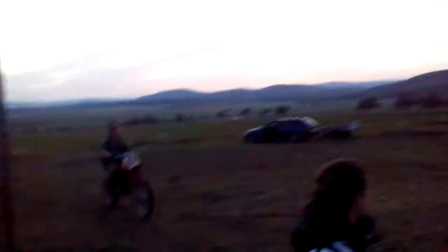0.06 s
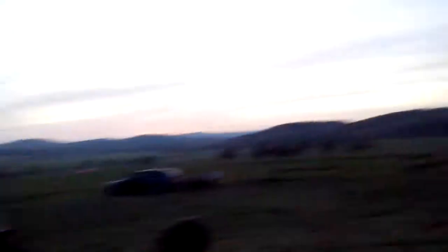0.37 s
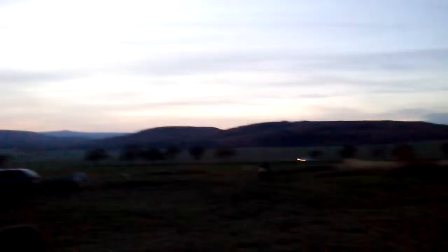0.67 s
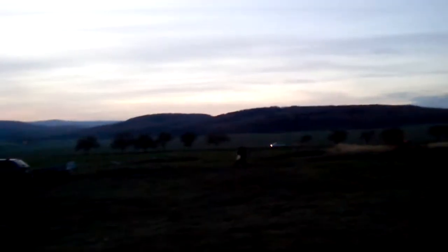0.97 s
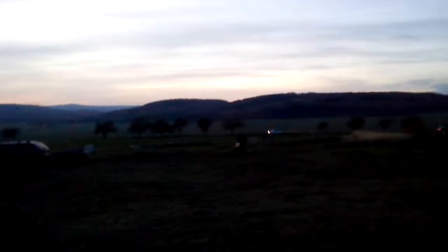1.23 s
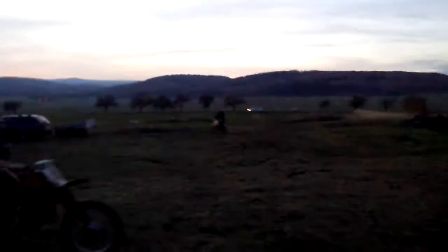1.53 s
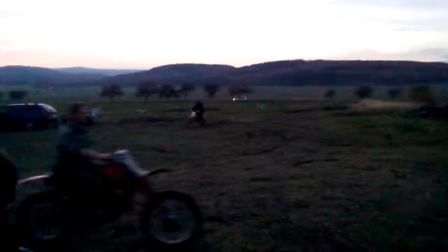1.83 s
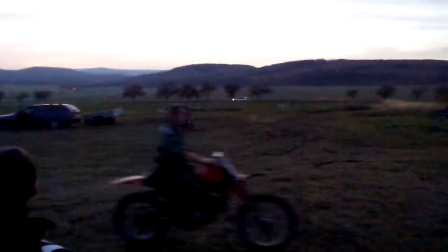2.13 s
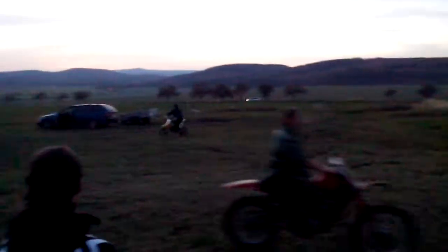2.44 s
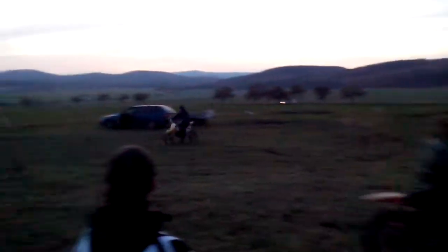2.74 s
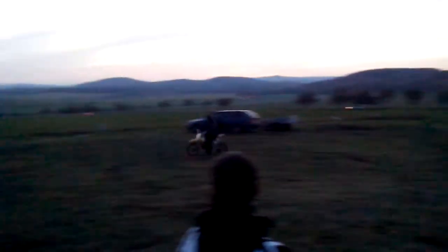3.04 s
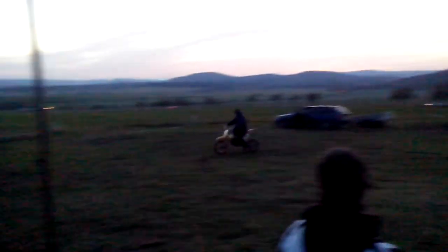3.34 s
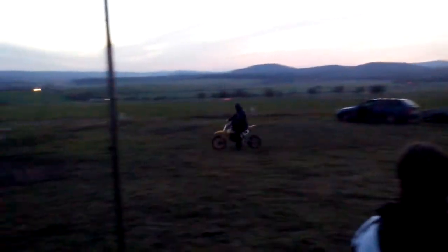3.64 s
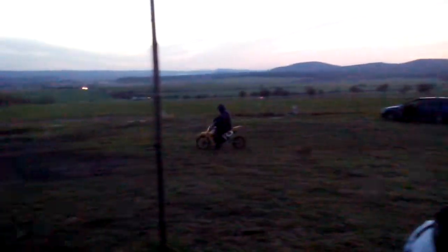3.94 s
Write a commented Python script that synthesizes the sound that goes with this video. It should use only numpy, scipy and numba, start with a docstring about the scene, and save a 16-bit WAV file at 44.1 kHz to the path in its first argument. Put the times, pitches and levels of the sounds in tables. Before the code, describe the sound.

Dirt bike engines outdoors, one rasping past nearby and one droning far off, in light wind.

```python
"""A low boom carries over an open field: a distant single-cylinder dirt bike revs, shifts up twice and
rolls off. Close by, a second one rides slowly past, left to right, its exhaust swelling to a bark and
rasp over the hiss and rattle of engine and chain. Each engine is a train of firing pulses: their rate
sets the pitch, and the resonances they excite in pipe and casing set the timbre.
A light wind rumbles on the microphones."""
import sys
import numpy as np
from scipy import signal
from scipy.io import wavfile
from scipy.ndimage import uniform_filter1d
from numba import njit

SR = 44100
rng = np.random.default_rng(int(sys.argv[2]) if len(sys.argv) > 2 else 0)


def to_wav(s):
    """Save 16-bit WAV."""
    ch = np.atleast_2d(s).T  # columns
    pcm = np.round(np.clip(ch, -1, 1) * 32767)  # PCM
    wavfile.write(sys.argv[1], SR, pcm.astype(np.int16))


N = 176400
T = np.arange(N) / SR
GAS_DECAY_S = .003

# Loudness of the near bike's engine and chain. Each row: time in seconds, level in dB.
MACHINERY_LEVEL = [(0.0, -31.5), (0.6, -29.5), (1.1, -29), (1.55, -31), (1.85, -27.5), (2.2, -25.5),
                   (2.7, -27), (3.1, -27.5), (3.4, -29.5), (3.7, -30.5), (4.0, -37.5)]
# Lag of the near bike at the right microphone. Each row: time in seconds, delay in seconds.
RIGHT_DELAY = [(0, 0.0013), (.4, 0.0012), (.6, 0.0013), (.9, .0014), (1.15, 0.0013), (1.75, .0012),
               (2.1, 0.0011), (2.4, 0.0011), (2.8, 0.000933), (3.1, 0.00081), (3.45, 0.00067), (4, 0.0006)]


def from_db(db):
    """Amplitude grows tenfold for every 20 dB."""
    return 10 ** (np.asarray(db) / 20)


def in_time(rows):
    """Linear interpolation gives each column of a time curve at every sample."""
    times, *columns = np.transpose(rows)
    return [np.interp(T, times, column) for column in columns]


def at_hz(points, hz):
    """Interpolation on a logarithmic frequency axis reads a spectrum at one frequency."""
    frequencies, values = np.transpose(points)
    return np.interp(np.log(hz), np.log(frequencies), values)


def even(x):
    """Division by the running rms holds the slow level at 1."""
    power = uniform_filter1d(uniform_filter1d(x ** 2, size=4400), size=4400)
    return x / np.sqrt(power + 1e-18)


def fade(clicks, decay_s):
    """Each impulse starts an exponential decay."""
    return signal.lfilter([1], [1, -np.exp(-1 / (decay_s * SR))], clicks + 1e-18)


def firings(speed, first_cycle, uneven_db, jitter_s):
    """A quasi-periodic impulse train: one click a cycle, varying a little in strength and timing."""
    cycles = np.cumsum(in_time(speed)[0]) / SR
    onsets_s = np.interp(np.arange(first_cycle, cycles[-1], 1), cycles, T)
    timing, strength = rng.standard_normal((len(onsets_s), 2)).T
    samples = ((onsets_s + jitter_s * timing) * SR).astype(int)
    clicks = np.zeros(N)
    clicks[np.clip(samples, 0, N - 1)] = from_db(uneven_db * np.minimum(strength, 1.5))
    return clicks


def puffs(clicks, rough, decay_s):
    """Each firing is a pressure pulse followed by a decaying burst of turbulence."""
    envelope = np.sqrt(2 / (decay_s * SR)) * fade(clicks, decay_s)
    return clicks + rough * envelope * rng.standard_normal(N)


@njit
def resonate(x, hz, width_hz):
    """A damped resonator of peak gain 1, its centre frequency given at every sample."""
    angle = 2 * np.pi * hz / SR
    r = np.exp(-np.pi * width_hz / SR)
    y = np.zeros(len(x))
    for i in range(2, len(x)):
        drive = (1 - r * r) / 2 * (x[i] - x[i - 2])
        y[i] = drive + 2 * r * np.cos(angle[i]) * y[i - 1] - r * r * y[i - 2]
    return y


def ring(x, modes, band_hz, scale=1):
    """Modal superposition: resonances add with alternating sign, band-limited and held at rms 1."""
    total = sum((-1) ** k * from_db(db) * resonate(x, centre * scale * np.ones(N), width)
                for k, (centre, width, db) in enumerate(modes))
    return even(signal.sosfilt(signal.butter(2, band_hz, "band", fs=SR, output="sos"), total))


def arrive(x, lag_s):
    """A path difference brings the sound to the right microphone later than to the left."""
    left, right = np.broadcast_to(x, (2, N))
    return np.array([left, np.interp(T - lag_s, T, right)])


def far_bike():
    """Only the low exhaust resonances carry this far; the boom gains an edge at high revs."""
    # Engine speed. Each row: time in seconds, firings per second.
    speed = [(0, 56), (.1, 58.4), (.25, 59.5), (.4, 64), (.5, 64.5), (.68, 62.5), (.77, 48.5), (.92, 48.5),
             (1.15, 50), (1.35, 53.5), (1.55, 56.3), (1.78, 56.5), (1.88, 44.3), (2.1, 44.3), (2.4, 45.5),
             (2.46, 41), (2.7, 38.7), (2.9, 36.8), (3.25, 36.8), (3.6, 35.8), (4, 35.7)]
    # Loudness of the exhaust. Each row: time in seconds, level in dB.
    level = [(0.0, -18.5), (0.15, -18.5), (0.3, -16), (0.5, -19), (0.62, -19.5), (0.75, -18), (0.9, -16),
             (1.3, -16.5), (1.6, -16.5), (1.75, -17), (1.9, -17), (2.25, -15), (2.42, -17.5), (2.6, -15.5),
             (2.85, -21), (3.3, -21), (3.7, -19), (4.0, -20)]
    # Two sets of pipe resonances. Each row: frequency in Hz, bandwidth in Hz, level in dB.
    boom_modes = [(123.3, 40, 0.5), (182.2, 38.6, -4.5), (235.2, 46.7, -6.5)]
    edge_modes = [(237.3, 100, 4), (357, 13, -12), (344, 76, -2.5), (537, 87, -21)]
    clicks = firings(speed, first_cycle=.55, uneven_db=.8, jitter_s=.00008)
    gas = puffs(clicks, rough=.08, decay_s=.006)
    boom = ring(gas, boom_modes, band_hz=(77, 596))
    edge_db = -9.5 + (in_time(speed)[0] - 55)  # 1 dB more for each extra firing per second
    edge = from_db(edge_db) * ring(gas, edge_modes, band_hz=(206, 795))
    return arrive(from_db(in_time(level)[0] - 3) * (boom + edge), lag_s=.001)


def double_hit(x, delay_s=.0045, second_db=-9):
    """Delay and add: a weaker second hit follows each firing a few milliseconds later."""
    return x + from_db(second_db) * np.interp(T - delay_s, T, x)


def scatter(x, t60_s=.1):
    """Scattering leaves a short diffuse tail, different in each channel."""
    t = np.arange(SR // 4) / SR
    tail = rng.standard_normal((2, len(t))) * from_db(-60 * t / t60_s)
    tail /= np.sqrt(np.sum(tail ** 2, axis=1, keepdims=True))
    return signal.fftconvolve(x[None], tail, axes=1)[:, :N]


def near_exhaust(clicks):
    """Forced resonance: the firings ring the pipe in four registers, thud, drone, bark and rasp."""
    # Turbulence of the firings. Each row: time in seconds, roughness from 0 to 1.
    turbulence = [(0, .2), (1.4, .22), (1.8, .3), (2.1, .27), (2.3, .42), (2.72, .35), (2.85, .12),
                  (3.45, .14), (3.6, .38), (3.76, .12), (4, .14)]
    # Pipe resonances. Each row: frequency in Hz, bandwidth in Hz, level in dB.
    thud_modes = [(56, 18, -6.5), (113, 210, -3.5), (254, 86, -3)]
    drone_modes = [(290, 77, -3.5), (327.3, 16, 9), (384, 55, -1), (514, 89, -8.5)]
    rasp_modes = [(1047, 140, 0.5), (1417, 13, 0.5), (1612, 37, 5), (1813, 24, -1), (1924, 33, 3.5),
                  (2320, 290, -10.5), (2619, 65, -1), (3174, 270, -9.5), (4040, 600, -22)]
    # Main resonance, rising with the throttle. Each row: time in seconds, frequency in Hz.
    bark_centre = [(0, 653), (1.0, 683), (1.7, 665), (2.1, 712), (2.4, 651), (2.7, 667), (3.0, 703),
                   (3.25, 732), (3.5, 620), (3.8, 603), (4, 570)]
    # Bark resonances. Each row: multiple of the main one, bandwidth in Hz, level in dB.
    bark_modes = [(.84, 70, -2), (1.002, 76.8, 5), (1.161, 90, 3.5), (1.37, 70, -16.5)]
    # Loudness of the low registers. Each row: time in seconds, level in dB.
    thud_level = [(0, -45), (1.0, -42), (2.0, -29), (2.6, -28.5), (3.1, -40.5), (4, -30)]  # strongest from 2 to 2.6 s, returning at the end
    drone_level = [(0, -27), (1, -46.5), (2.4, -43.5), (2.85, -38.5), (3.05, -25.5), (3.5, -33), (3.8, -27),
                   (4, -28)]
    # Loudness of the high registers. Each row: time in seconds, bark in dB, rasp in dB.
    bark_rasp_levels = [(0, -32.5, -40), (.3, -52, -47), (.6, -37.5, -41.5), (.95, -24.5, -23.5),
                        (1.2, -22.5, -30), (1.45, -19.5, -29), (1.6, -16, -25.5), (1.82, -17, -31),
                        (1.92, -22, -29), (2.1, -23, -32.5), (2.35, -20.5, -27), (2.48, -20, -27),
                        (2.72, -15, -26.5), (2.95, -16, -20), (3.2, -16.5, -22), (3.28, -24.5, -28),
                        (3.48, -17.5, -23.5), (3.6, -13.5, -24), (3.66, -18.5, -27.5), (3.78, -17, -24.5),
                        (4, -20.5, -27)]
    # Stereo balance of the rasp. Each row: time in seconds, left minus right in dB.
    rasp_pan = [(0, -8.5), (1, 1), (2.2, 2), (2.7, 2.5), (3.2, -8), (3.7, -2), (4, 1)]
    bark_db, rasp_db = in_time(bark_rasp_levels)
    bark_hz, = in_time(bark_centre)
    rough, = in_time(turbulence)
    long_puffs = puffs(double_hit(clicks), rough, decay_s=.007)
    harsh_puffs = puffs(clicks, rough=.35, decay_s=GAS_DECAY_S)
    short_puffs = puffs(double_hit(clicks), rough, decay_s=GAS_DECAY_S)
    thud = from_db(in_time(thud_level)[0]) * ring(long_puffs, thud_modes, band_hz=(46, 455))
    drone = from_db(in_time(drone_level)[0]) * ring(long_puffs, drone_modes, band_hz=(230, 650))
    bark = from_db(bark_db - 3) * ring(long_puffs, bark_modes, band_hz=(414, 1300), scale=bark_hz)
    rasp = from_db(rasp_db - 3.5) * ring(harsh_puffs, rasp_modes, band_hz=(820, 5050))
    rasp += flares(short_puffs)
    balance = from_db(in_time(rasp_pan)[0] * np.array([[.5], [-.5]]))
    direct = arrive(thud + drone + bark + balance * rasp, in_time(RIGHT_DELAY)[0])
    return direct + scatter(from_db(-14) * bark + from_db(-11) * rasp)


def drift(rate_hz):
    """Low-passed noise wanders slowly, with a standard deviation of 1."""
    step, settle = 40, 2000  # samples per step, steps for the filter to settle
    r = np.exp(-2 * np.pi * rate_hz * step / SR)
    white = rng.standard_normal(N // step + settle + 2)
    slow = signal.lfilter([1], [1, -2 * r, r * r], white)[settle:]
    return np.interp(np.arange(N) / step, np.arange(len(slow)), slow / slow.std())


def banded_noise(spectrum, flicker_db, flicker_hz):
    """Partly coherent stereo noise in half-octave bands that flicker independently; rms 1."""
    # Likeness of the two channels. Each row: frequency in Hz, correlation from 0 to 1.
    coherence = [(50, 0), (200, 1), (1000, 0.8), (7000, .4)]
    edges_hz = 22 * 2 ** np.arange(0, 9, .5)
    white = rng.standard_normal((2, 2, N))
    out = 0
    for k, (low, high) in enumerate(zip(edges_hz, edges_hz[1:])):
        hz = np.sqrt(low * high)
        band = signal.butter(2, [low, high], "band", fs=SR, output="sos")
        mid, side = signal.sosfilt(band, white[k % 2])
        alike = at_hz(coherence, hz)
        gain = from_db(at_hz(spectrum, hz) + flicker_db * drift(flicker_hz))
        out = out + gain * (np.sqrt(1 + alike) * mid + np.sqrt(1 - alike) * side * [[1], [-1]])
    return out / out.std()


def near_clatter(clicks, ticks_per_s=240):
    """Amplitude modulation: the hiss throbs with the firings and with random chain and valve ticks."""
    # Hiss of engine and chain. Each row: frequency in Hz, relative spectral density in dB.
    spectrum = [(25, -30.5), (500, -7), (900, 1), (1500, 8), (2500, -0.5), (3500, -5), (4500, -3.5),
                (5600, -6), (6700, -6.5), (7500, -6)]
    ticks = (rng.random(N) < ticks_per_s / SR) * np.minimum(rng.exponential(1, N), 2)
    throb = even(1 + .29 * fade(clicks, decay_s=.0033) + .77 * fade(ticks, decay_s=.0017))
    hiss = throb * banded_noise(spectrum, flicker_db=1.46, flicker_hz=6.9)
    return arrive(from_db(in_time(MACHINERY_LEVEL)[0] + .5) * hiss, in_time(RIGHT_DELAY)[0])


def near_rattle(clicks):
    """Impact excitation: every firing knocks the engine's metal casing into its natural modes."""
    # Casing resonances. Each row: frequency in Hz, bandwidth in Hz, level in dB.
    casing_modes = [(2245, 90, 0.5), (2727, 64, 3), (3012, 200, 3), (4050, 340, 0), (4900, 150, -0.5),
                    (5370, 380, -8), (6455, 250, 2)]
    knocks = puffs(clicks, rough=.4, decay_s=GAS_DECAY_S)
    gain = from_db(in_time(MACHINERY_LEVEL)[0] - 13.5)
    rattle = gain * ring(knocks, casing_modes, band_hz=(1950, 7700))
    return arrive(rattle, in_time(RIGHT_DELAY)[0]) + scatter(from_db(-1.5) * rattle)


def wind():
    """Pressure fluctuations of the wind at the microphones make an uneven low rumble."""
    # Rumble and faint air of the field. Each row: frequency in Hz, relative spectral density in dB.
    spectrum = [(25, -39), (38, -30.5), (52, -14), (80, -4), (150, -1), (300, -5), (600, -22.5),
                (1200, -19), (7000, -41.5)]
    return from_db(-29) * banded_noise(spectrum, flicker_db=4.5, flicker_hz=1.3)


def flares(pulses, fade_s=.12):
    """Swept resonance: ringing tones and whines of the near bike swell, glide and die as it passes."""
    # Passing tones. Each row: start and end in seconds, first and last frequency in Hz,
    # bandwidth of each of two resonators in series in Hz, level in dB.
    glides = [(.25, 1.478, 1027, 1095, 172, -31.5), (0.39, .8, 1846, 1860, 200, -29.5),
              (0.513, 1.004, 1402, 1400, 81, -31.5), (0.603, 1.7, 888, 922, 156, -29.5),
              (1.01, 1.444, 1600, 1624, 50, -41), (1.757, 2.5, 543, 534, 90, -25),
              (1.9, 2.35, 1630, 1657, 280, -31), (2.124, 2.41, 780, 894, 220, -34.5),
              (2.21, 2.58, 1890, 2080, 220, -30), (2.495, 3.22, 2550, 2775, 330, -34.5),
              (2.65, 3.197, 2200, 2130, 300, -33), (2.702, 3.257, 908, 928, 245, -24),
              (2.843, 3.25, 3030, 3270, 380, -28.5), (2.907, 3.527, 637, 580, 130, -24.5),
              (3.105, 3.555, 960, 940, 230, -28), (3.05, 3.853, 1200, 1236, 120, -46.5),
              (3.273, 4.1, 2000, 1760, 420, -39.5), (3.3, 4.1, 3120, 2930, 400, -36),
              (3.26, 3.725, 4300, 4550, 400, -42.5), (3.485, 4.103, 738, 735, 130, -30.5)]
    out = np.zeros(N)
    for start, end, first_hz, last_hz, width, db in glides:
        hz = np.interp(T, [start, end], [first_hz, last_hz])
        swell = np.clip(np.minimum(T - start, end - T) / fade_s, 0, 1)
        ringing = resonate(resonate(pulses, hz, width), hz, width)
        out += from_db(db) * swell * even(ringing)
    return out


def scene():
    """Superposition of both bikes and the wind; one pulse train drives all parts of the near bike."""
    # Engine speed of the near bike. Each row: time in seconds, firings per second.
    near_speed = [(0.0, 49.19), (0.12, 50.11), (0.45, 46.66), (0.62, 46.25), (0.73, 46.9), (0.84, 48.01),
                  (0.92, 47.57), (1.0, 49.88), (1.1, 47.01), (1.18, 48.13), (1.3, 47.59), (1.55, 47.25),
                  (1.73, 46.99), (2.02, 48.81), (2.23, 49.11), (2.32, 49.97), (2.55, 49.42), (2.68, 49.14),
                  (2.76, 52.41), (2.89, 52.31), (2.98, 57.01), (3.14, 56.56), (3.23, 57.71), (3.29, 55.44),
                  (3.37, 57.02), (3.5, 55.51), (3.7, 53.93), (3.85, 55.99), (4.0, 53.49)]
    clicks = firings(near_speed, first_cycle=.5, uneven_db=1.4, jitter_s=.00005)
    near_bike = near_exhaust(clicks) + near_clatter(clicks) + near_rattle(clicks)
    return far_bike() + near_bike + wind()


def record(dry, cutoff_hz=7250):
    """An elliptic low-pass filter cuts the top of the treble steeply."""
    return signal.sosfilt(signal.ellip(12, .2, 90, cutoff_hz, fs=SR, output="sos"), dry)


dry = scene()
out = record(dry)
to_wav(out)
```